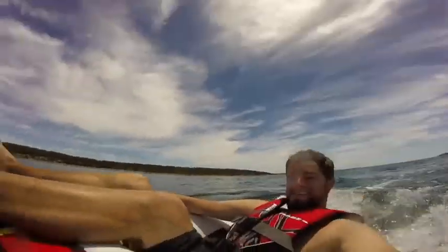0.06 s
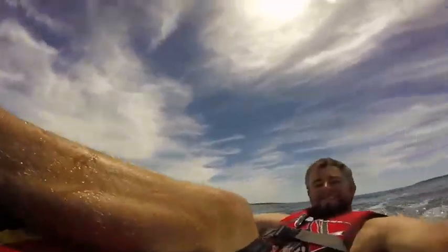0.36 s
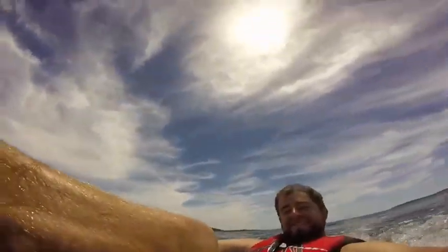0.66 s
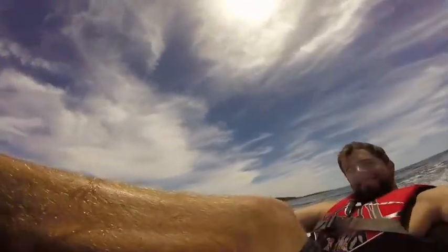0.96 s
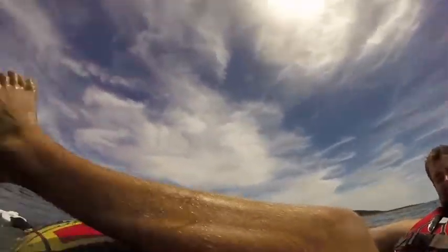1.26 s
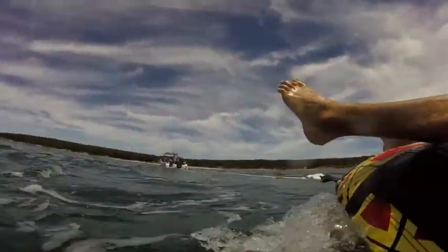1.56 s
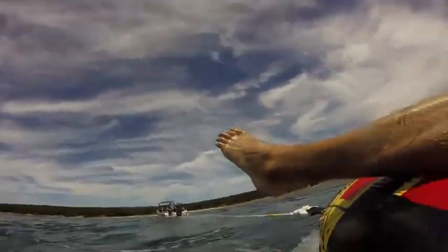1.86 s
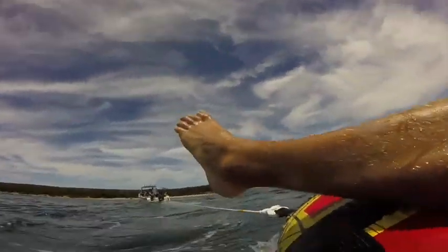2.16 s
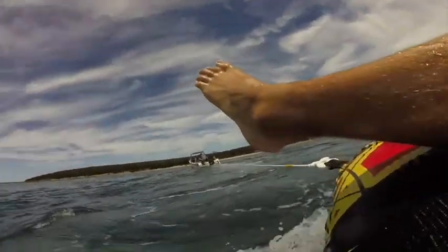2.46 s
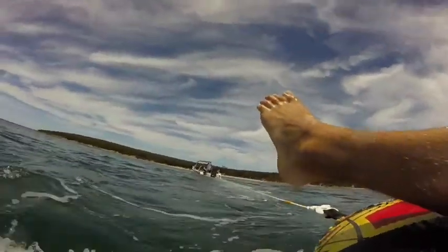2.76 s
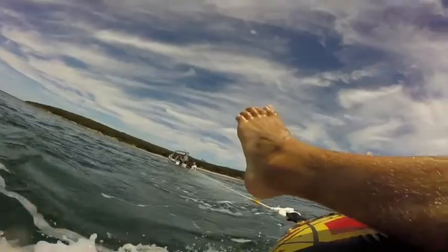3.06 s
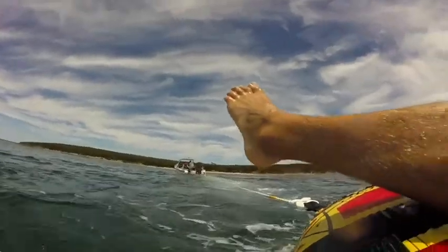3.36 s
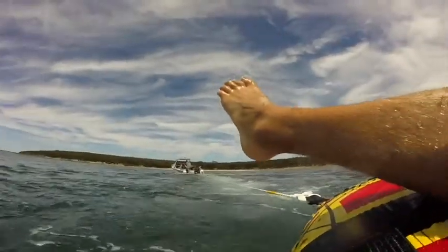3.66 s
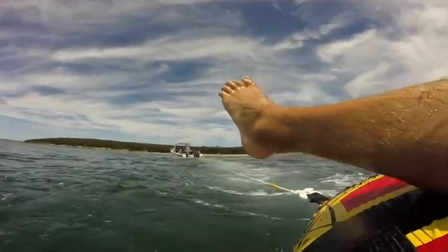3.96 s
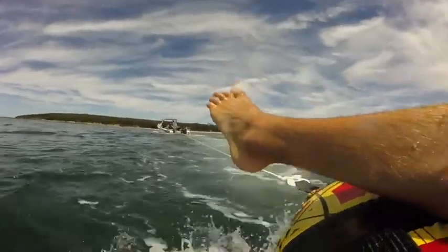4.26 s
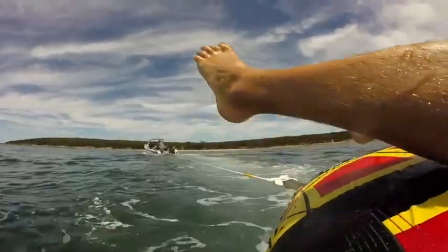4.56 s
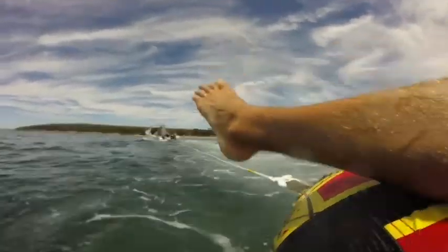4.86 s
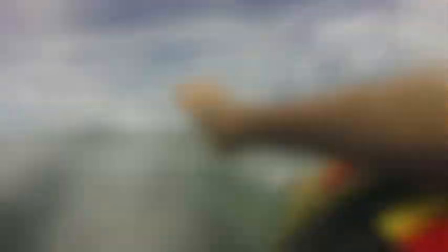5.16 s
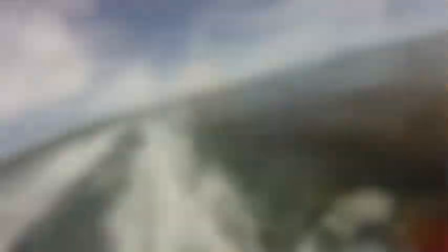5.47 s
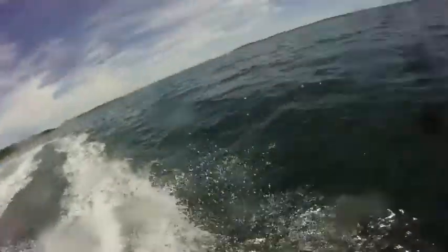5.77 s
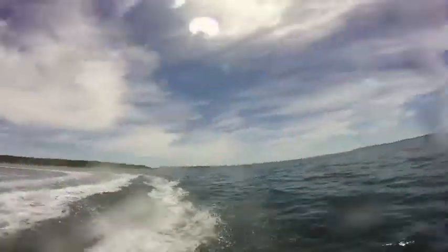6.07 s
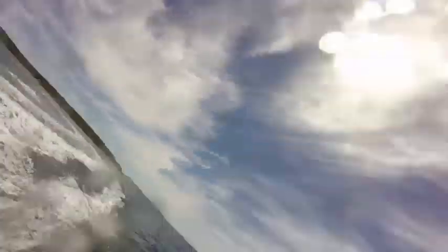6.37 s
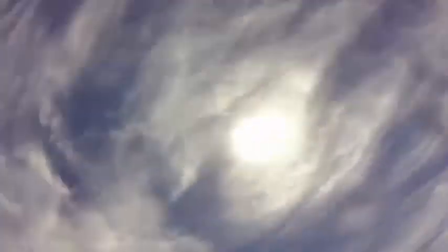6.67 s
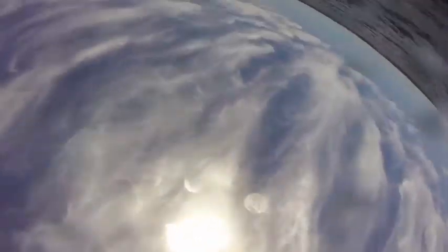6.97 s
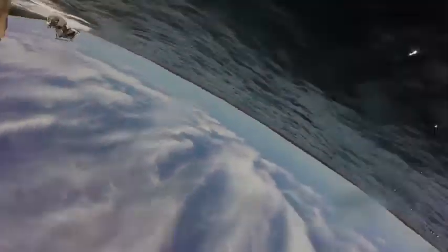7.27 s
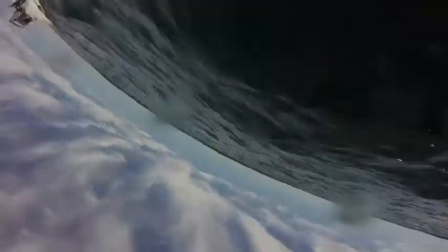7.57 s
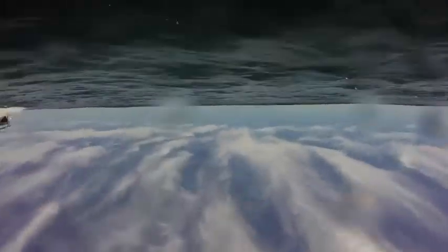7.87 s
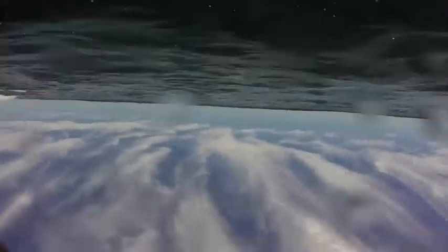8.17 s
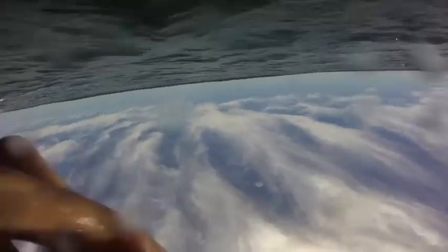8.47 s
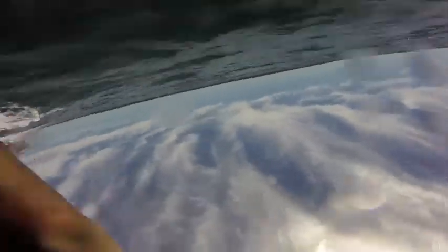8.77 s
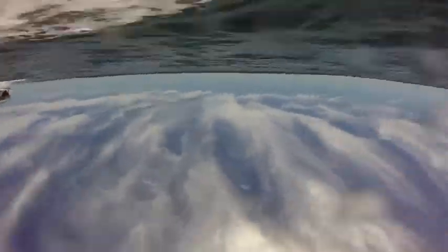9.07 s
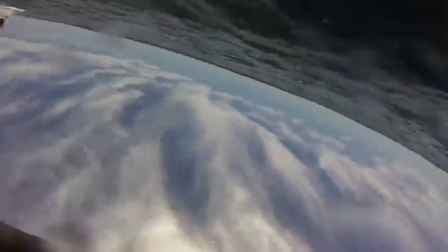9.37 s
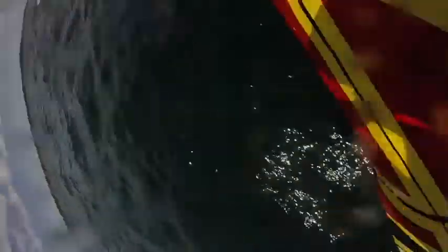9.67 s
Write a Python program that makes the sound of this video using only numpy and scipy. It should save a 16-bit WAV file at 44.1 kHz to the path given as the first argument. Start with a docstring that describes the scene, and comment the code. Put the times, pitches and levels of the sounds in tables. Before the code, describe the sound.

Soft spray and bumps of a tube skimming choppy water give way to dull churning foam, then close, crashing splashes with deep thuds.

```python
"""A camera in a waterproof case rides on an inflatable tube towed over choppy water.
At first spray hisses through the case, drops tick on its shell and the tube thumps on the waves.
From 5 s the case gets wet: the hiss fades and the wake (the foam behind the boat) roars, hollow and dull.
From 7.5 s sheets of water crash over the case, with slaps, gurgling trapped air and deep thuds."""
import sys
import numpy as np
from scipy import signal
from scipy.fft import rfft, irfft
from scipy.io import wavfile
from scipy.ndimage import uniform_filter1d, minimum_filter1d

SR = 44100
rng = np.random.default_rng(int(sys.argv[2]) if len(sys.argv) > 2 else 0)


def wrap_up_sound(samples):
    """Save the sound to the file named by the first command line argument, as 16-bit audio."""
    columns = np.atleast_2d(samples).T
    # keep every value between -1 and 1, then stretch to whole-number steps
    tamed = np.clip(columns, -1, 1)
    steps = np.round(tamed * 32767).astype(np.int16)
    wavfile.write(sys.argv[1], SR, steps)


N = 428211
TIME = np.arange(N) / SR


# sheets of water: (start [s], build time [s], drain time [s], relative body level [dB],
# fizz level [dB], drumming level [dB], fall while draining [dB])
WATER_SHEETS = [(7.533, 0.044, 0.042, -25.5, -38.5, -45, 14.5), (7.694, 0.01, 0.029, -29, -39, -64, 8.5),
                (7.749, 0.0031, 0.012, -38, -71, -62, 13), (8.102, 0.0095, 0.03, -27, -38, -45, 22.5),
                (8.242, 0.024, 0.07, -28.5, -42, -64, 22), (8.304, 0.086, 0.02, -32.5, -47, -65, 4),
                (8.41, 0.069, 0.062, -25.5, -38, -40, 17.5), (8.621, 0.021, 0.0054, -39.5, -53, -53, 5),
                (8.646, 0.019, 0.12, -22, -40, -33, 34), (8.817, 0.0072, 0.024, -37.5, -59, -52, 10),
                (8.848, 0.014, 0.045, -29, -43.5, -41, 7), (8.93, 0.023, 0.15, -28, -44.5, -37.5, 31.5),
                (9.167, 0.048, 0.024, -42, -61.5, -51, 7), (9.265, 0.0078, 0.018, -36, -56.5, -49, 7),
                (9.295, 0.0069, 0.014, -35, -57.5, -45, 18), (9.336, 0.0036, 0.076, -46, -61, -50.5, 20),
                (9.491, 0.023, 0.075, -30.5, -46, -44, 11)]
def sheet_levels(rise_db=7, edge_s=0.0018):
    """Each sheet covers the case, builds, drains and tears off: volumes of body, fizz and drumming."""
    out = np.zeros((3, N))
    for start, build_s, drain_s, *peaks_db, loss_db in WATER_SHEETS:
        crest = start + build_s
        shape = [(start, -rise_db), (crest, 0), (crest + drain_s, -loss_db)]
        out += from_db(peaks_db)[:, None] * gains(shape, edge_s)
    return out


# tone of a sheet's low body and high fizz: (frequency [Hz], relative level [dB])
BODY_TONE = [(60, 1.5), (150, -17.5), (380, -15), (550, -3.5), (720, 1), (1050, -2.5), (1350, 2),
             (1750, -4), (2150, -8.5), (2500, -22), (3200, -34), (5000, -69)]
FIZZ_TONE = [(1500, -13), (2600, 6.5), (3050, 5), (3400, 5), (4250, 9), (4900, -2.5), (6200, -9),
             (7000, -18.5), (7500, -15), (8100, -67.5)]
# how the case rings under a sheet: (frequency [Hz], width [Hz], boost [dB])
SOAKED_RING = [(720, 120, 3.5), (1276, 170, 5.5), (1520, 120, 4), (2020, 60, 7.5), (3026, 100, 10.5),
               (3370, 80, 0.5), (3680, 200, 3.5), (3830, 100, 3), (4210, 150, 2.5), (5220, 90, 8.5),
               (6130, 300, 0.5), (6970, 620, 13)]
def sheets(body_level, fizz_level):
    """Water rushes over the case: a gurgling body and a fizz that surge together."""
    rush = droplets(per_s=8000, spread_db=1.64) * from_db(3.4 * drift(140))
    # the water film changes thickness, so its tiny echo keeps shifting the tone
    echo_s = 0.00109 * np.exp(0.272 * drift(25))
    rush = rush + 0.42 * np.interp(TIME - echo_s, TIME, rush)
    body = unit_power(colour(rush, BODY_TONE, SOAKED_RING))
    body = unit_power(body + from_db(-5) * gurgle())
    fizz = unit_power(colour(rush, FIZZ_TONE, SOAKED_RING))
    return body_level * from_db(-1.1) * body + fizz_level * fizz


def gurgle(hz=1056, width_hz=158, wander_octaves=0.38):
    """Air trapped between water and case rings; its pitch wanders as it changes size."""
    ring = resonate(rng.standard_normal(N), hz, 3 * width_hz)
    ring = resonate(ring, hz, width_hz)
    speed = 2 ** (wander_octaves * drift(32))
    return unit_power(np.interp(np.cumsum(speed) % N, np.arange(N), ring))


# loudness of the wake: (time [s], relative level [dB])
WAKE_LEVEL = [(5.0, -77), (5.15, -64), (5.45, -55), (5.72, -49), (5.87, -54.5), (6.25, -53), (6.95, -53.5),
              (7.5, -50), (7.64, -64), (8.2, -66.5), (8.8, -56), (9.45, -66.5), (9.71, -63.5)]
# its tone: (frequency [Hz], relative level [dB])
WAKE_TONE = [(150, -9.5), (380, -12), (600, -9.5), (750, -2), (1100, -10.5), (1500, -11), (2000, -13),
             (2600, -21), (4200, -23.5), (5200, -35), (7300, -43.5), (8200, -80.5)]
# how the wet case rings: (frequency [Hz], width [Hz], boost [dB])
WET_RING = [(762, 210, 7.5), (1032, 35, 10.5), (1274, 410, 9), (3056, 90, 5.5), (3630, 110, -1),
            (4000, 430, 2.5)]
# surges of foam that make a hollow sing: (time [s], length [s], relative peak [dB])
FOAM_SURGES = [(6.68, 0.11, -44), (6.82, 0.12, -47.5), (7.16, 0.048, -41), (7.26, 0.32, -48.5),
               (7.42, 0.083, -43)]
def wake(hollow_hz=1337, width_hz=135):
    """Churning foam roars through the wet case, while one hollow space rings unevenly."""
    level = gains(WAKE_LEVEL, edge_s=0.15)[0]
    foam = droplets(per_s=9000, spread_db=1.5) * from_db(1.2 * drift(45))
    roar = unit_power(colour(foam, WAKE_TONE, WET_RING))
    ring_level = np.hypot(level * from_db(-8), swells(FOAM_SURGES)[0])
    ring = resonate(rng.standard_normal(N), hollow_hz, 2 * width_hz)
    ring = unit_power(resonate(ring, hollow_hz, width_hz) * from_db(5.2 * drift(28)))
    return level * from_db(3) * roar + ring_level * from_db(1.5) * ring


# loudness of the steady spray and the fine mist: (time [s], level [dB])
SPRAY_LEVEL = [(0, -63.5), (0.26, -67), (0.35, -58), (1.25, -60), (2.3, -59.5), (3.2, -58.5), (3.64, -61),
               (5.1, -62)]
MIST_LEVEL = [(0, -72), (0.25, -74), (0.4, -68), (1.8, -65.5), (2.3, -71), (3.2, -69.5), (3.65, -73),
              (5.1, -72)]
# splashes thrown up by waves: (time [s], length [s], spray [dB], mist [dB], sizzle [dB])
WAVE_SPLASHES = [(0.09, 0.04, -58, -72, -85), (0.38, 0.13, -63, -67, -86), (0.77, 0.073, -55, -65, -83),
                 (1.56, 0.1, -60.5, -69.5, -81), (1.865, 0.047, -56.5, -61, -83),
                 (1.952, 0.039, -51.5, -47.5, -71), (2.08, 0.073, -57.5, -58.5, -72),
                 (2.2, 0.02, -71, -63.5, -85), (2.41, 0.07, -65, -60, -87), (2.52, 0.041, -56, -58.5, -81),
                 (2.87, 0.055, -63, -66, -80), (3.26, 0.033, -57.5, -74, -76), (4.4, 0.8, -73, -80, -82)]
# tone of spray, mist and sizzle: (frequency [Hz], relative level [dB])
SPRAY_TONE = [(120, -6.5), (300, -9), (450, -10), (950, -13.5), (1250, -10), (1500, -5), (1850, -15.5),
              (2300, -10.5), (2800, -22.5), (3500, -49.5), (4200, -22.5), (5100, -26.5), (6200, -30.5),
              (8500, -26), (10500, -37), (15000, -41)]
MIST_TONE = [(1000, -10.5), (2500, 12), (3700, 6), (4300, 1), (5100, -20.5), (6300, -14.5), (8300, -25),
             (10000, -25), (15000, -30.5)]
SIZZLE_TONE = [(2000, -12), (4500, -0.5), (6200, 3.5), (8200, -1.5), (10500, -7), (14000, -15),
               (15000, -16)]
# how the dry case rings: (frequency [Hz], width [Hz], boost [dB])
DRY_RING = [(1630, 850, 12.5), (2051, 80, 10.5), (2994, 84, 17.5), (3840, 390, 19.5), (6130, 940, 11),
            (8100, 600, 3)]
def spray():
    """Dense droplets ring the dry case, mist comes in patches and the finest droplets sizzle."""
    dense = droplets(per_s=8000, spread_db=3.5) * from_db(drift(50))
    hiss = unit_power(colour(dense, SPRAY_TONE, DRY_RING))
    fine = droplets(per_s=3000, spread_db=-1.5) * from_db(1.4 * drift(18))
    fine += from_db(-6.5) * droplets(per_s=40, spread_db=2)
    mist = unit_power(colour(fine, MIST_TONE))
    sizzle = unit_power(colour(droplets(per_s=2000, spread_db=1.5), SIZZLE_TONE))
    strays = unit_power(colour(droplets(per_s=40, spread_db=3.5), SIZZLE_TONE))
    steady = gains(SPRAY_LEVEL, edge_s=1)[0]
    splash, splash_mist, splash_sizzle = swells(WAVE_SPLASHES)
    return (np.hypot(steady, splash) * hiss
            + np.hypot(gains(MIST_LEVEL, edge_s=1)[0], splash_mist) * mist
            + splash_sizzle * sizzle
            + steady * from_db(-29) * strays)


# knocks on tube and case: (time [s], peak [dB], final pitch [Hz], time to fade 60 dB [s])
KNOCKS = [(.027, -40.5, 123, 0.068), (0.068, -33.5, 140, 0.042), (.072, -26, 32, 0.2),
          (0.244, -33, 54, 0.12), (0.408, -39, 113, 0.08), (0.587, -43.5, 150, 0.06),
          (0.954, -42, 100, 0.07), (1.330, -30.5, 183, 0.018), (1.382, -39.5, 102, 0.063),
          (1.633, -38, 43, 0.1), (1.761, -38.5, 36, 0.16), (1.844, -30, 52, 0.042), (1.956, -34, 61, 0.087),
          (2.325, -36.5, 37, 0.12), (2.444, -32, 42, 0.039), (2.991, -42.5, 50, 0.068),
          (3.142, -32, 83, 0.097), (3.164, -36, 32, 0.095), (3.259, -40.5, 81, 0.14),
          (6.537, -11.5, 19.5, 0.38), (6.538, -15.5, 61, 0.014), (7.522, -21, 26, 0.36),
          (8.106, -11.5, 26, 0.15), (8.395, -14.5, 31, 0.065), (8.654, -18, 60, 0.064),
          (8.854, -19, 31, 0.11), (9.035, -20, 25.8, 0.22), (9.491, -24, 22.4, 0.48)]
def thumps(stiffening=0.87, contact_s=0.0072):
    """Each knock of water starts stiff and high, sags in pitch and dies within a few swings."""
    out, t = np.zeros(N), TIME[:SR // 2]
    for start, peak_db, hz, fade_s in KNOCKS:
        pitch = hz * (1 + stiffening * np.exp(-t / contact_s))
        level = from_db(peak_db - 60 * t / fade_s)
        add(out, start, -level * np.sin(2 * np.pi * np.cumsum(pitch) / SR))
    return out


# slaps: (time [s], relative peak [dB], ring pitch [Hz], time to fade 60 dB [s])
WATER_SLAPS = [(6.712, -35, 1920, 0.017), (7.5195, 0, 730, 0.012), (7.563, -15.5, 1390, 0.019),
               (7.640, -51, 1700, 0.021), (8.024, -44, 1620, 0.046), (8.101, -26.5, 1290, 0.031),
               (8.112, -9.5, 1360, 0.0027), (8.395, -18, 1510, 0.012), (8.433, -18, 1270, 0.007),
               (8.595, -29, 1760, 0.024), (8.9385, 2.5, 2080, 0.0057), (9.167, -38, 1870, 0.015),
               (9.268, -32, 1490, 0.025), (9.296, -40, 1380, 0.042), (9.340, -51, 1510, 0.011)]
# their tone: (frequency [Hz], relative level [dB])
SLAP_TONE = [(100, -13.5), (700, 10), (1500, 8.5), (2400, 1.5), (4300, -6.5), (5500, -16), (7400, -27),
             (8600, -91)]
def slaps():
    """Water smacks sharply against the wet case."""
    return from_db(1.5) * impacts(WATER_SLAPS, SLAP_TONE, ring_width_hz=250, ring_db=8.5)


# shoves: (time [s], relative peak [dB], ring pitch [Hz], time to fade 60 dB [s])
WATER_SHOVES = [(1.331, -61, 430, 0.019), (5.653, -29, 830, 0.033), (6.539, -28.5, 245, 0.055),
                (6.548, -22, 830, 0.016), (7.520, -12.5, 433, 0.028), (8.102, -16, 660, 0.084),
                (8.648, -24, 612, 0.048), (8.855, -26, 467, 0.033), (9.515, -23.5, 624, 0.18)]
# their tone: (frequency [Hz], relative level [dB])
SHOVE_TONE = [(60, 2.5), (140, -2), (280, -12), (450, -4.5), (900, -3), (1300, -15.5), (2500, -26),
              (6000, -46.5)]
def shoves():
    """Water pushes against the case with a dull thud."""
    return from_db(-3) * impacts(WATER_SHOVES, SHOVE_TONE, ring_width_hz=270, ring_db=15)


# bubbles against the case: (time [s], length [s], first pitch [Hz], last pitch [Hz], peak [dB])
AIR_POCKETS = [(0.066, 0.078, 3400, 3600, -59), (0.428, 0.013, 1160, 980, -54),
               (0.849, 0.009, 744, 830, -49.5), (1.496, 0.19, 3500, 3620, -65.5),
               (3.148, 0.0074, 1000, 1160, -48.5), (6.548, 0.012, 740, 1020, -26),
               (7.519, 0.011, 790, 416, -33), (7.697, 0.034, 1156, 1890, -21),
               (8.103, 0.013, 1088, 573, -26), (8.24, 0.011, 1225, 1110, -30),
               (8.256, 0.03, 1010, 588, -31), (8.328, 0.078, 805, 950, -40),
               (8.398, 0.011, 980, 824, -22.5), (8.466, 0.011, 690, 736, -28),
               (8.597, 0.0081, 770, 1020, -27), (9.493, 0.0044, 900, 760, -24),
               (9.498, 0.0087, 1620, 890, -29), (9.514, 0.021, 690, 783, -26.5),
               (9.577, 0.016, 1210, 1600, -37.5)]
def air_pockets(roughness=0.16):
    """A pocket of air rings unevenly and slides in pitch as it shrinks or opens."""
    out, wobble = np.zeros(N), drift(500)
    for start, length, first_hz, last_hz, peak_db in AIR_POCKETS:
        age = np.linspace(0, 1, int(length * SR))
        uneven = wobble[int(start * SR):][:len(age)]
        pitch = first_hz * (last_hz / first_hz) ** age * (1 + 0.041 * uneven)
        swell = np.abs(np.sin(np.pi * age ** 0.57))
        level = from_db(peak_db) * swell * (1 + roughness * uneven)
        add(out, start, level * np.sin(2 * np.pi * np.cumsum(pitch) / SR))
    return out


# drops: (time [s], relative peak [dB], ring pitch [Hz], time to fade 60 dB [s])
WATER_DROPS = [(.062, -36, 1450, 0.0054), (.0695, -22.5, 1456, 0.016), (.071, -22, 2230, 0.011),
               (.076, -39, 2390, 0.12), (.358, -42, 2090, 0.024), (.512, -39, 2960, 0.0056),
               (1.331, -38.5, 1640, 0.021), (1.433, -42, 2180, 0.017), (1.944, -31.5, 1440, 0.066),
               (1.959, -33.5, 1360, 0.021), (2.383, -35, 1590, 0.12), (2.4237, -26, 2250, 0.015),
               (2.447, -33.5, 1270, 0.044), (2.800, -27.5, 1640, 0.019), (2.820, -29.5, 1540, 0.012),
               (2.857, -25.5, 1574, 0.013)]
# their tone: (frequency [Hz], relative level [dB])
DROP_TONE = [(100, 11), (600, -5), (1500, 6.5), (2300, 2.5), (3300, -5), (4500, -26), (8000, -34),
             (15000, -55)]
def drops():
    """Single drops tick on the dry case."""
    return from_db(-1.5) * impacts(WATER_DROPS, DROP_TONE, ring_width_hz=106, ring_db=10.5)


# air and water beating on the case: (time [s], relative level [dB])
GUST_LEVEL = [(0, -62), (3.55, -65), (4.6, -64), (4.7, -53), (5.3, -57.5), (6.15, -54.5), (6.55, -51),
              (7.0, -54.5), (7.55, -46), (8.15, -64), (8.56, -46), (8.7, -42), (9.04, -34), (9.14, -47.5),
              (9.35, -43), (9.43, -68), (9.71, -49.5)]
# waves under the tube: (time [s], length [s], drumming level [dB], relative gust level [dB])
WAVE_BUMPS = [(0.02, 0.11, -55, -62), (0.43, 0.14, -66, -52.5), (0.66, 0.1, -56, -53),
              (1.4, 0.077, -63, -52), (1.99, 0.28, -55, -52.5), (2.44, 0.086, -47.5, -45),
              (2.86, 0.068, -56.5, -51), (3.28, 0.08, -60, -63), (4.15, 0.25, -66, -58)]
# slow pressure swings as the case is waved about: (time [s], length [s], peak [dB])
CASE_SWINGS = [(5.76, 0.49, -28), (6.55, 0.45, -35), (7.58, 0.34, -32.5), (8.95, 0.31, -31)]
# tone of the gusts and of the drumming: (frequency [Hz], relative level [dB])
GUST_TONE = [(10, -6), (25, 5.5), (45, -1), (80, -5.5), (160, -25.5), (400, -75)]
DRUM_TONE = [(35, -16), (80, -2.5), (130, -0.5), (230, -9.5), (400, -19.5), (800, -31), (2000, -64.5)]
def rumble(sheet_drumming):
    """Gusts beat on the swaying case; ripples drum on the tube, harder with each wave and sheet."""
    lumpy_air = rng.standard_normal(N) * from_db(1.8 * drift(26))
    gusts = unit_power(colour(lumpy_air, GUST_TONE))
    sway = unit_power(resonate(drift(30), hz=7.3, width_hz=3))
    drumming = unit_power(colour(droplets(per_s=500, spread_db=2), DRUM_TONE))
    gust_level = gains(GUST_LEVEL)[0]
    wave_drumming, wave_gusts = swells(WAVE_BUMPS)
    ripples = from_db(-6.5) * gains(SPRAY_LEVEL, edge_s=0.21)[0]
    ripples += from_db(-5) * gains(WAKE_LEVEL, edge_s=0.1)[0]
    return (np.hypot(gust_level, wave_gusts) * from_db(4) * gusts
            + np.hypot(gust_level * from_db(-0.5), swells(CASE_SWINGS)[0]) * sway
            + np.hypot(ripples, wave_drumming + sheet_drumming) * drumming)


def impacts(rows, tone, ring_width_hz, ring_db):
    """Each blob of water hits, splatters briefly and rings the shell."""
    out, t = np.zeros(N), TIME[:SR // 10]
    for start, peak_db, hz, fade_s in rows:
        force = rng.standard_normal(len(t)) * from_db(-60 * t / fade_s)
        force[0] += 3   # the first touch
        hit = colour(force + from_db(ring_db) * resonate(force, hz, ring_width_hz), tone)
        add(out, start, from_db(peak_db) * hit / np.abs(hit).max())
    return out


def droplets(per_s, spread_db):
    """Tiny random hits of uneven size."""
    sizes = from_db(spread_db * np.minimum(rng.exponential(1, N), 5))
    return unit_power(sizes * rng.choice([-1, 1], N) * (rng.random(N) < per_s / SR))


def drift(per_s):
    """A wandering line that heads for a new random value `per_s` times a second."""
    points = rng.standard_normal(int(N / SR * per_s) + 2)
    return unit_power(np.interp(TIME * per_s, np.arange(len(points)), points))


def gains(rows, edge_s=0.0022):
    """Turn each dB column into a volume curve that fades out within `edge_s` beyond its ends."""
    times, *columns = np.transpose(rows)
    out = np.zeros((len(columns), N))
    span = slice(*np.searchsorted(TIME, [times[0] - edge_s, times[-1] + edge_s]))
    t = TIME[span]
    fade = np.clip(1 + np.minimum(t - times[0], times[-1] - t) / edge_s, 0, 1)
    out[:, span] = [fade * from_db(np.interp(t, times, db)) for db in columns]
    return out


def swells(rows):
    """Bell-shaped rises in volume, one curve for each dB column; overlaps add in power."""
    power = np.zeros((len(rows[0]) - 2, N))
    for centre, length, *peaks_db in rows:
        span = slice(*np.searchsorted(TIME, [centre - 2 * length, centre + 2 * length]))
        bell = np.exp(-2 * ((TIME[span] - centre) / length) ** 2)
        power[:, span] += np.outer(from_db(peaks_db), bell) ** 2
    return np.sqrt(power)


def colour(x, tone, rings=()):
    """Shape a sound to follow a tone curve, with ringing peaks on top."""
    size = 8192
    hz = np.maximum(np.arange(size // 2 + 1) * SR / size, 1)
    tone_hz, tone_db = np.transpose(tone)
    level = np.interp(np.log(hz), np.log(tone_hz), tone_db)
    for centre, width, boost in rings:
        level = level + boost / (1 + (2 * (hz - centre) / width) ** 2)
    # make the filter ring only after a hit, never before (minimum phase)
    cepstrum = irfft(np.log(from_db(level)))
    cepstrum[1:size // 2] *= 2
    cepstrum[size // 2 + 1:] = 0
    return signal.fftconvolve(x, irfft(np.exp(rfft(cepstrum))))[:len(x)]


def resonate(x, hz, width_hz):
    """Ring at one pitch; a smaller width rings longer."""
    r = np.exp(-np.pi * width_hz / SR)
    feedback = [1, -2 * r * np.cos(2 * np.pi * hz / SR), r * r]
    return signal.lfilter(np.array([1, 0, -1]) * (1 - r * r) / 2, feedback, x)


def add(track, start_s, sound):
    """Mix a short sound into the track."""
    start = max(round(start_s * SR), 0)
    track[start:start + len(sound)] += sound[:N - start]


def from_db(db):
    """Turn decibels into a volume factor."""
    return 10 ** (np.asarray(db) / 20)


def unit_power(x):
    """Scale to an average power of 1."""
    return x / np.sqrt(np.mean(x ** 2) + 1e-20)


def scene(wetting_s=(5.0, 6.2), film_cut_hz=7500):
    """One microphone in the case: a water film shuts out the spray and dulls all but spray and drops."""
    wetness = np.interp(TIME, wetting_s, [0, 1])
    ticks = drops()
    body, fizz, drumming = sheet_levels()
    water = slaps() + shoves() + wake() + sheets(body, fizz) + air_pockets()
    film = signal.cheby1(12, 0.5, film_cut_hz, fs=SR, output="sos")
    muffled = signal.sosfilt(film, water + thumps() + rumble(drumming))
    return ((1 - wetness) * spray() + ticks + muffled)[None]


def record(dry, ceiling=0.255, cutoff_hz=15200):
    """A limiter quickly turns down the loudest hits; the highest treble is cut."""
    gain = ceiling / np.maximum(np.abs(dry), ceiling)
    held = minimum_filter1d(gain, size=181)
    smooth = uniform_filter1d(uniform_filter1d(held, size=91), size=91)
    treble_cut = signal.cheby1(12, 0.2, cutoff_hz, fs=SR, output="sos")
    return signal.sosfilt(treble_cut, dry * smooth)


dry = scene()
out = record(dry)
wrap_up_sound(out)
```